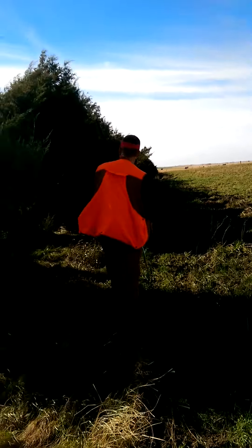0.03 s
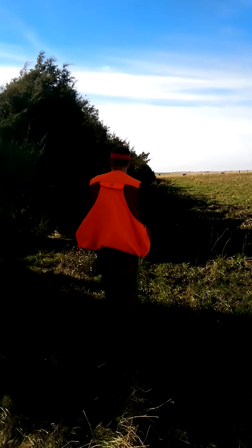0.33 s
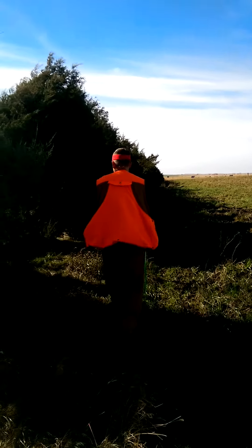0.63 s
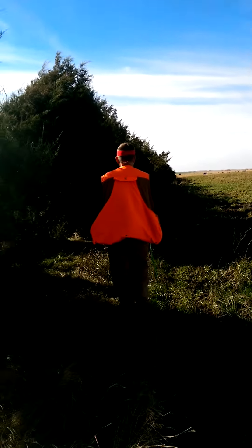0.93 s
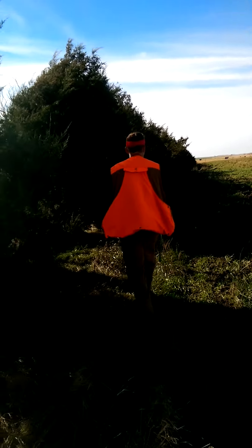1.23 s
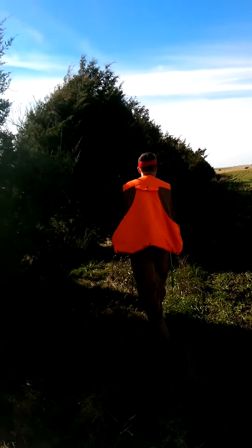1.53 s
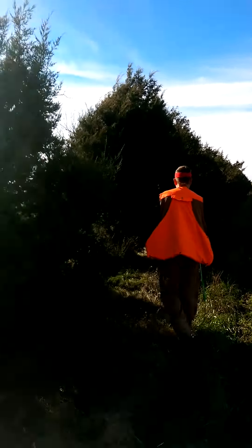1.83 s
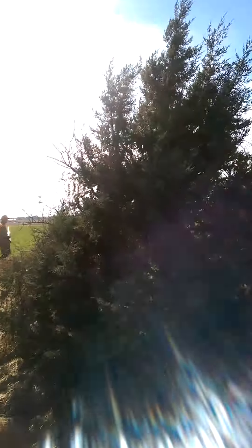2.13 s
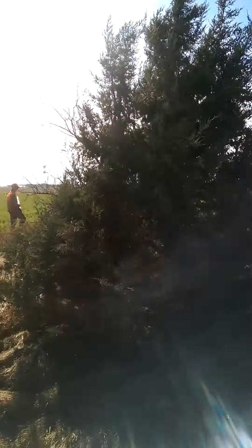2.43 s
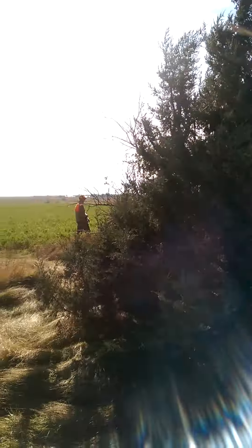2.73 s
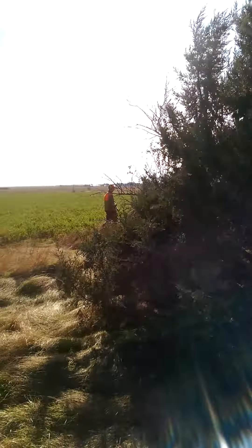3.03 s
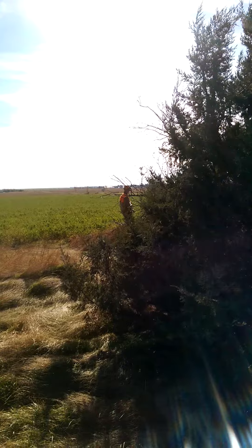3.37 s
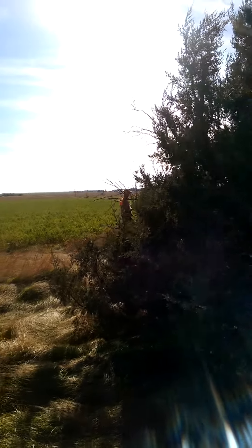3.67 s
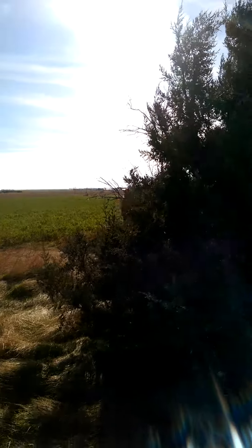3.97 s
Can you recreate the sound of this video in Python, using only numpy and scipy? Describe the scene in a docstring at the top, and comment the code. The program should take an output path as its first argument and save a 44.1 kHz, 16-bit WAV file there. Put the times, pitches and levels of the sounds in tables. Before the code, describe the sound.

Low, gusty wind rumble builds on the microphone above faint cricket chirps and rustling grass.

```python
"""Open grassland: wind rises and buffets a hand-held phone, mostly on its left microphone.
Small whirls of air (eddies) sweep past faster as a gust grows, so the rumble gets brighter as it
gets louder. Distant air hisses behind it all, grass and cedar twigs rustle, crickets chirp faintly
with their wings, there are short dry snaps and a thin high tick, and one bough scrapes by."""
import sys
import numpy as np
from scipy import signal
from scipy.fft import rfft, irfft
from scipy.io import wavfile
from scipy.ndimage import uniform_filter1d, map_coordinates

SR = 44100
rng = np.random.default_rng(int(sys.argv[2]) if len(sys.argv) > 2 else 0)


def wrap_up_sound(samples):
    """Save the sound to the file named by the first command line argument, as 16-bit audio."""
    columns = np.atleast_2d(samples).T
    # keep every value between -1 and 1, then stretch to whole-number steps
    tamed = np.clip(columns, -1, 1)
    steps = np.round(tamed * 32767).astype(np.int16)
    wavfile.write(sys.argv[1], SR, steps)


N = 176400
TIME = np.arange(N) / SR


def gain(db):
    """Turn decibels into a number to multiply by."""
    return 10 ** (np.asarray(db) / 20)


def curve(rows):
    """Join (time, value) rows with straight lines."""
    return np.interp(TIME, *np.array(rows).T)


def pan(db):
    """Left and right gains, with the left louder by db."""
    return gain(np.array([[db], [-db]]) / 2)


def colour(x, tone):
    """Shape the lows and highs of x by (Hz, dB) rows, at an average strength (rms) of 1."""
    hz, db = np.array(tone).T
    f = np.maximum(np.fft.rfftfreq(N, 1 / SR), 1)
    shape = gain(np.interp(np.log(f), np.log(hz), db))
    treble_cut = np.hypot(1, (f / hz[-1]) ** 4 / 2)
    y = irfft(rfft(x) * shape / treble_cut, N)
    return y / y.std()


def noise(tone):
    """Random hiss with the given lows and highs."""
    return colour(rng.standard_normal(N), tone)


def wander(rate):
    """A smooth random wobble that picks a new value rate times a second."""
    k = max(int(SR / rate), 1)
    held = rng.standard_normal(N)[np.arange(N) // k]
    smooth = uniform_filter1d(uniform_filter1d(held, k, mode="wrap"), k, mode="wrap")
    return 2.5 * np.tanh(.6 * smooth)


# Tone of the big swirls around the phone, and of the small eddies at speed 1: f/Hz, level/dB
SWIRL_TONE = [(20, -10.5), (50, -5.5), (85, -1.5), (140, -4.5), (220, -18), (400, -48)]
EDDY_TONE = [(20, -44), (70, -9.5), (165, 3), (260, 0), (450, -6.5), (700, -21.5), (1150, -30), (1800, -45),
             (3500, -69)]
def buffet(breeze, gusts, bright_db, rumble_db, flutter_db, burst_db):
    """Air hits one microphone: the harder it pushes, the faster eddies pass, over a deep rumble."""
    power, edge = gain(curve(breeze)) ** 2, 0
    for at, peak_db, swell, edge_db in gusts:
        gust = gain(peak_db) ** 2 * np.exp(-((TIME - at) / swell) ** 2)
        power += gust
        edge += edge_db * gust
    edge /= power  # each gust counts by its share of the power
    steady_db = 10 * np.log10(power)
    push_db = steady_db + flutter_db * wander(80) + burst_db * wander(400)
    speed = 2 ** ((push_db + bright_db + edge + 20) / 12)  # 12 dB stronger is twice as fast
    eddies = gain(push_db + .5) * map_coordinates(noise(EDDY_TONE), [np.cumsum(speed)], mode="mirror")
    thump_db = -.88 * edge  # dull gusts rumble more
    rumble = gain(steady_db + rumble_db + thump_db + flutter_db * wander(27.83)) * noise(SWIRL_TONE)
    return signal.sosfilt(signal.butter(2, 35, "high", fs=SR, output="sos"), eddies + rumble)


# Push of the wind beneath the gusts: t/s, level/dB
LEFT_BREEZE = [(0, -55), (1.45, -56), (1.66, -46), (1.76, -36), (2.03, -26), (2.19, -29), (2.42, -21),
               (2.61, -28), (2.96, -24), (3.2, -24), (3.29, -27), (3.37, -34), (3.44, -32), (3.58, -25),
               (3.68, -38), (3.81, -27), (3.92, -29), (4, -23)]
RIGHT_BREEZE = [(0, -55), (1, -56), (1.5, -56), (2.17, -36.5), (2.55, -49.5), (3.3, -51), (3.55, -45),
                (4, -53)]
# Gusts: peak t/s, level/dB, swell and fade time/s, edge/dB (+ a bright slap, - a dull thump)
LEFT_GUSTS = [(.525, -44, 0.036, -3), (.975, -44.5, 0.022, -3), (1.173, -36.5, 0.011, -1),
              (1.511, -34, .011, -2.5), (1.555, -31, .013, -5.5), (1.62, -30.5, .013, -5),
              (1.698, -32, .01, -2), (1.734, -26.5, .02, -.5), (1.788, -28.5, .005, 1),
              (1.83, -28, 0.0092, -1), (1.95, -21, .01, -.5), (1.99, -18.5, .022, 2.5),
              (2.041, -23.5, .012, 3), (2.084, -19.5, 0.0049, 0), (2.106, -23.5, .013, 3),
              (2.228, -25.5, .016, 3), (2.271, -17.5, .016, -6.5), (2.298, -16, 0.0059, .5),
              (2.328, -17, .012, 3), (2.36, -14, .016, 1.5), (2.388, -16.5, 0.01, -4),
              (2.456, -20, .011, 3), (2.497, -15.5, .004, -.5), (2.556, -22, .004, 3),
              (2.585, -19.5, .012, -4.5), (2.624, -20, .004, .5), (2.648, -20, 0.0078, 1.5),
              (2.665, -13.5, 0.0092, -.5), (2.695, -14.5, 0.0098, 2), (2.723, -16.5, 0.0083, -2),
              (2.753, -13, .011, 0), (2.778, -16, .009, 1.5), (2.805, -19.5, .01, 3.5),
              (2.831, -17, .014, -8), (2.88, -15, 0.0098, -4.5), (2.91, -17, .014, .5),
              (2.929, -17.5, 0.0059, -5.5), (3.029, -18, .008, -.5), (3.048, -18.5, 0.014, -.5),
              (3.084, -22.5, 0.017, 2), (3.145, -23, 0.013, .5), (3.254, -22, .026, -1),
              (3.488, -18, .021, -2), (3.558, -25, 0.015, -2), (3.636, -24, .018, -1.5),
              (3.734, -18, .022, .5), (3.764, -18, .004, -.5), (3.86, -22, .024, .5), (3.957, -14, .011, 2),
              (3.979, -20, .012, -4.5)]
RIGHT_GUSTS = [(1.095, -45, 0.033, -3), (1.191, -36.5, .038, -1.5), (1.433, -41, 0.046, -3),
               (1.627, -41.5, 0.041, 0.5), (1.892, -32, 0.016, -0.5), (2.301, -35.5, 0.024, -2),
               (2.723, -35.5, .031, -0.5), (2.862, -35.5, 0.02, 1.5), (3.614, -30, 0.019, -1),
               (3.697, -29.5, 0.031, 1.5), (3.83, -32, .032, 1), (3.923, -33.5, 0.031, 1.5)]
def wind():
    """Each microphone gets its own gusts, the left one the strongest."""
    left = buffet(LEFT_BREEZE, LEFT_GUSTS, bright_db=-.5, rumble_db=-2, flutter_db=.91, burst_db=1.54)
    right = buffet(RIGHT_BREEZE, RIGHT_GUSTS, bright_db=3, rumble_db=-5, flutter_db=2.5, burst_db=1.43)
    return np.array([left, right])


# Tone of the distant air on each side: f/Hz, level/dB
LEFT_AIR_TONE = [(25, -22), (70, 4), (160, -2), (280, 3.5), (500, -2), (900, -2.5), (2000, -10.5),
                 (5500, -18), (8200, -12), (10500, -23.5), (15500, -28)]
RIGHT_AIR_TONE = [(25, -38), (90, -4), (170, -2.5), (280, 4.5), (550, -2), (1200, -4), (2400, -11),
                  (4000, -18.5), (9500, -28.5), (15500, -23)]
def distant_air():
    """Far wind over the field: a separate hiss on each side, both swelling gently together."""
    swell = gain(.5 * wander(3.45))
    return swell * np.array([gain(-52) * noise(LEFT_AIR_TONE), gain(-52.5) * noise(RIGHT_AIR_TONE)])


def rustle(levels, tone, pan_db, level_db, grain_db, flicker_db):
    """Countless tiny touches of uneven size, coming in small flurries."""
    grains = rng.standard_normal((2, N))
    grains *= gain(grain_db * np.minimum(rng.exponential(size=(2, N)), 6))
    sound = np.array([colour(side, tone) for side in grains])
    return sound * gain(curve(levels) + level_db + flicker_db * wander(70)) * pan(pan_db)


# Rise and fall of the grass: t/s, level/dB
GRASS_LEVELS = [(0, -59.5), (.3, -64.5), (.75, -63.5), (.88, -58), (1.2, -68), (1.65, -58.5), (1.98, -59.5),
                (2.12, -62), (2.26, -57), (2.38, -47.5), (2.7, -62), (2.84, -61), (2.92, -54), (3.06, -54),
                (3.16, -73), (3.45, -72), (3.72, -58), (4, -60)]
# Its tone: f/Hz, level/dB
GRASS_TONE = [(500, -24), (2000, -6), (4500, -5), (6200, -5), (8300, 2.5), (10500, -5.5), (15500, -16)]
def grass():
    """Dry blades rub together, mostly on the left."""
    return rustle(GRASS_LEVELS, GRASS_TONE, pan_db=10, level_db=-5, grain_db=3, flicker_db=2.5)


# Rise and fall of the twigs: t/s, level/dB
TWIG_LEVELS = [(0, -71), (1.3, -69), (1.62, -56.5), (1.92, -75), (2.0, -54.5), (2.28, -48.5), (2.38, -44.5),
               (2.55, -50), (2.68, -65), (2.98, -61.5), (3.15, -73), (4, -68)]
# Their tone: f/Hz, level/dB
TWIG_TONE = [(300, 0.5), (1000, 2.5), (2000, 1.5), (3000, 1.5), (4200, -8.5), (5300, -3), (8000, -17),
             (15500, -8)]
def cedar_twigs():
    """Twigs brush past on the right."""
    return rustle(TWIG_LEVELS, TWIG_TONE, pan_db=-6.5, level_db=-4.5, grain_db=3, flicker_db=1.6)


# One cricket a row: first chirp t/s, repeat time/s, top f/Hz, chirp length/s, drop on the right/dB
CHIRPS = [ (.035, .0803, 6700, .030, 13), (.051, .0599, 8780, .024, 15), (.056, .0565, 8300, .024, 12), ]
# Loudness of each cricket as the phone turns: t/s, level/dB
CHIRP_LEVELS = [
    [(0, -57.5), (1.5, -58), (2.7, -55.5), (4, -59)],
    [(.5, -61), (1.5, -64.5), (2.5, -52.5), (4, -61)],
    [(0, -59.5), (.6, -57), (1.3, -69), (4, -67)],
]
def crickets():
    """Each wing stroke is one short, slightly rough tone whose pitch arches up and down."""
    out = np.zeros((2, N))
    for (first, period, hz, length, drop_db), levels in zip(CHIRPS, CHIRP_LEVELS):
        from_middle = (TIME - first + .00092 * wander(2.7) + period / 2) % period - period / 2
        stroke = np.clip(2 * from_middle / length, -1, 1)
        pitch = hz * (1 - .14 * stroke ** 2 + .00465 * wander(900))  # 14% lower at both ends
        chirps = np.sin(2 * np.pi * np.cumsum(pitch) / SR) * np.cos(np.pi / 2 * stroke)
        level_db = curve(levels) + 1.1 * wander(18) + .65 * wander(400)
        out += chirps * gain(level_db) * gain([[0], [-drop_db]])
    return out


# Short dry snaps and one thin high tick, perhaps an insect:
# t/s, level/dB, centre f/Hz, fade time/s, level either side of the centre/dB
TICKS = [(0.173, -53, 3900, 0.0036, -17), (0.693, -53.5, 4500, 0.0038, -7),
         (0.767, -41.5, 6040, 0.0008, -3), (1.054, -57, 9300, 0.0072, -24), (1.655, -60, 2660, 0.0096, -13)]
def snaps_and_ticks():
    """Each is a burst of noise around one pitch, on the left, that dies in milliseconds."""
    out = np.zeros(N)
    for start, db, hz, fade, side_db in TICKS:
        age = np.maximum(TIME - start, 0)
        burst = noise([(hz / 10, side_db - 9), (hz * .68, side_db), (hz, 0),
                       (hz * 1.4, side_db), (hz * 2, side_db - 2)])
        out += gain(db) * burst * (TIME >= start) * np.exp(-age / fade)
    return out * pan(14)


# Rise and fall of the bough: t/s, level/dB
BOUGH_LEVELS = [(1.95, -85), (2.02, -53), (2.06, -45.5), (2.17, -54), (2.3, -85)]
# Its tone: f/Hz, level/dB
BOUGH_TONE = [(700, -2), (2100, 0), (3100, 4), (4100, -10), (5200, -2.5), (7500, -16)]
def bough():
    """One branch scrapes by on the right."""
    return rustle(BOUGH_LEVELS, BOUGH_TONE, pan_db=-6, level_db=-6.5, grain_db=3.5, flicker_db=1)


def scene():
    """Wind on both microphones over the quiet life of the field."""
    return wind() + distant_air() + grass() + cedar_twigs() + crickets() + snaps_and_ticks() + bough()


def record(dry):
    """The phone softens the strongest gusts and cuts the treble above 15750 Hz."""
    return signal.sosfilt(signal.ellip(10, .2, 70, 15750, fs=SR, output="sos"), np.tanh(dry))


dry = scene()
out = record(dry)
wrap_up_sound(out)
```